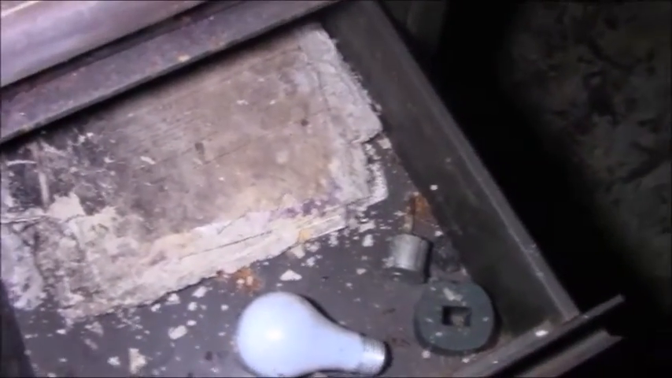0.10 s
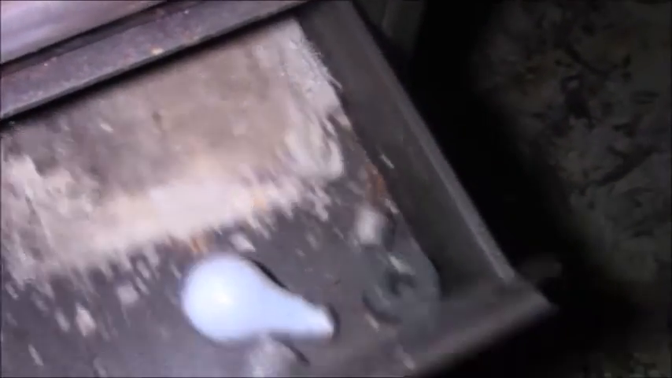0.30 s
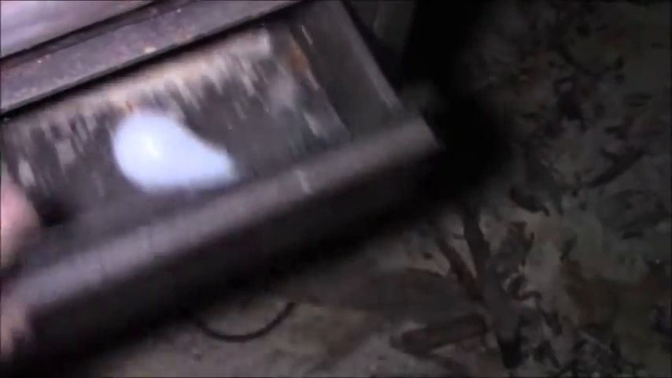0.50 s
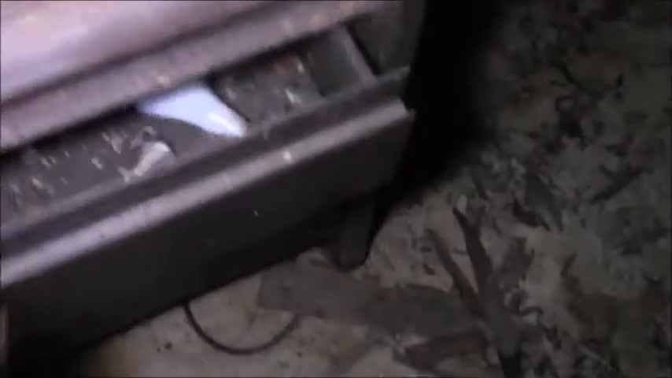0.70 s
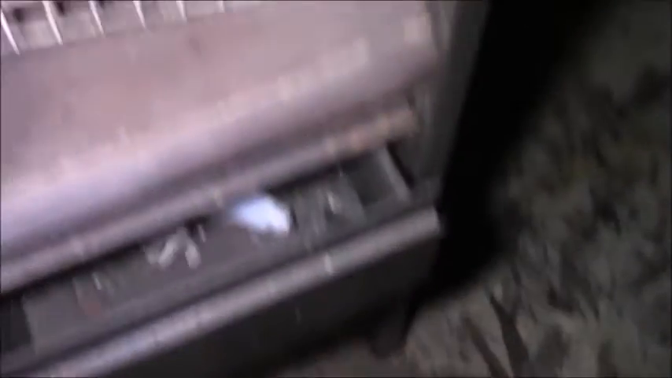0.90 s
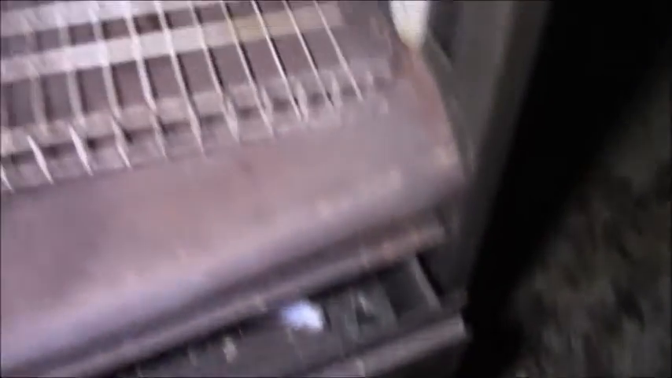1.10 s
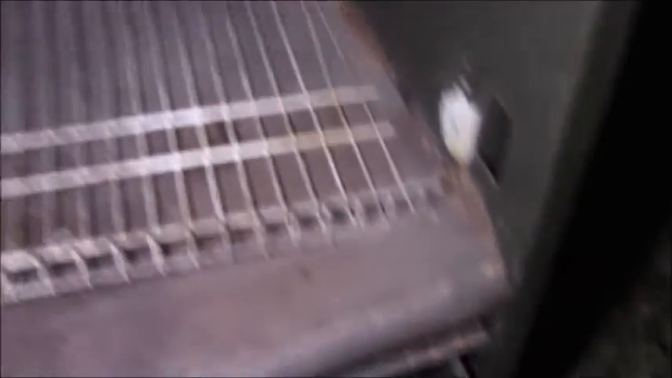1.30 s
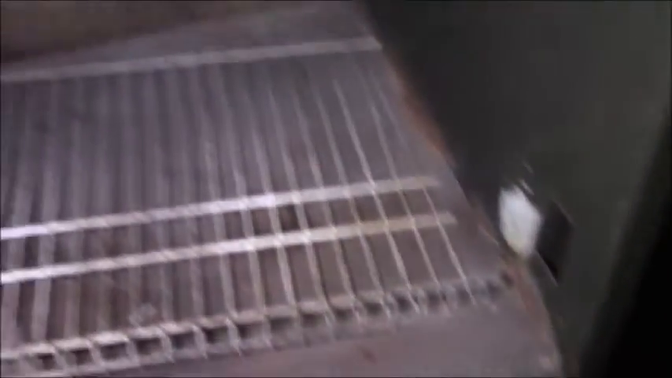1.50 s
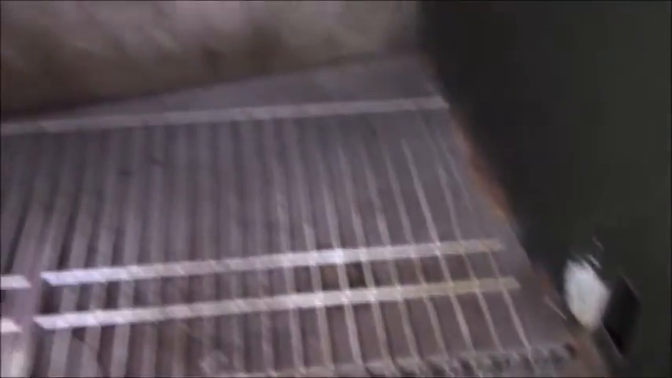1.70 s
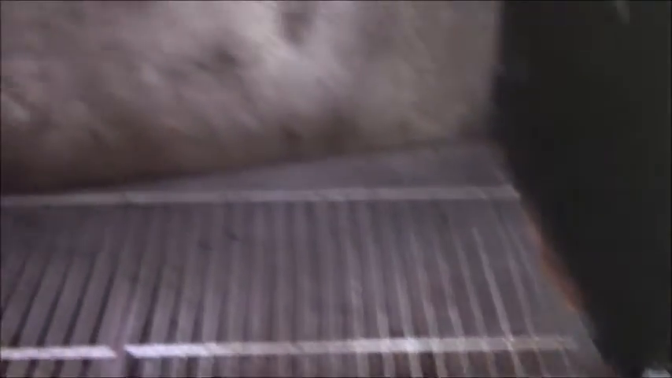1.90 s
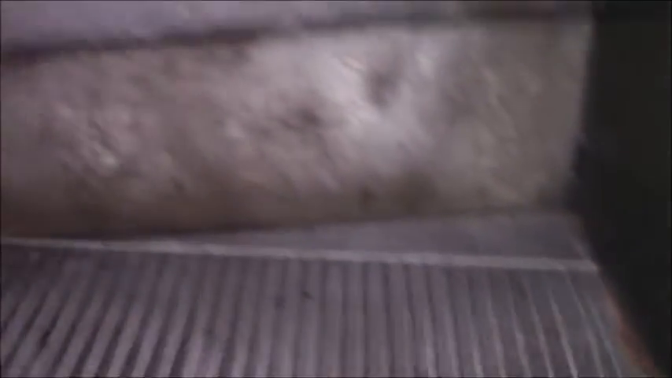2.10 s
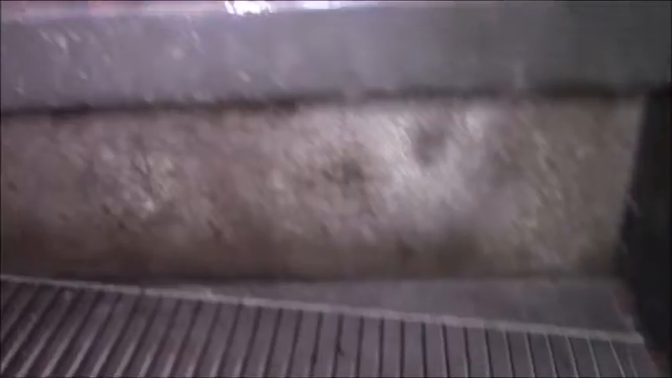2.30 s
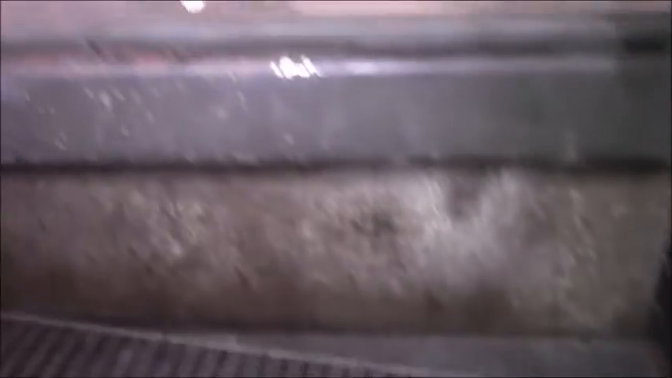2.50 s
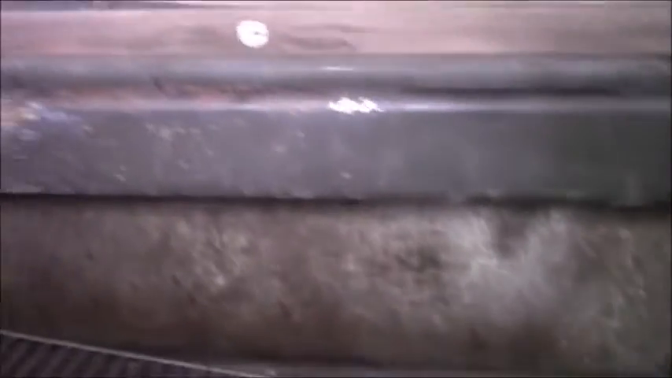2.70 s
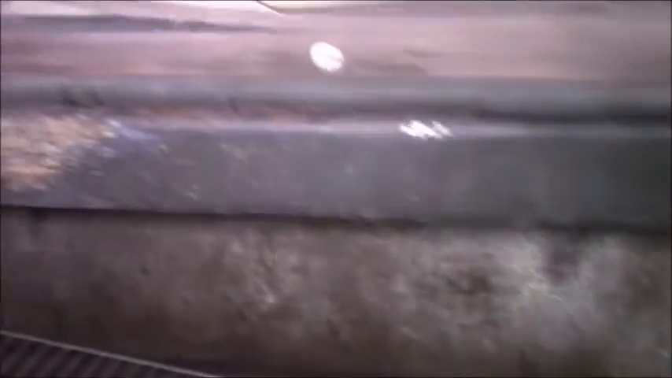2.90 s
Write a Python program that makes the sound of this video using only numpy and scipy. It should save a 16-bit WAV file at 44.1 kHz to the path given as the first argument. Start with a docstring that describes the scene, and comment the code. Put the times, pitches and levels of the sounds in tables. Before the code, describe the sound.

A rusty metal drawer knocks and thumps, then scrapes shut with gritty rasp and hollow panel boom from 0.2 to 0.7 s. A loose glass bulb clinks sharply at 0.7 s. Soft shuffling and low bumps follow; a metal speck bounces at 1.45 s, crumbs tick. From 2.15 s another drawer thumps and rasps out in two tugs, clunking at 2.7 s. Close, near-mono, bare room, faint hiss and thin whine.

```python
"""A rusty sheet-metal drawer is pushed shut, and another is dragged out in two tugs, in a bare workshop.
Random grit clicks hiss and rasp, coarser slips drive panel modes, and knocks and booms join in.
Around them a loose glass bulb clinks as decaying sines, a speck of metal bounces and crumbs tick.
A close pair of microphones hears it nearly in mono, over coloured-noise hiss and a thin sine whine."""
import sys
import numpy as np
from scipy import signal
from scipy.fft import rfft, irfft, next_fast_len
from scipy.io import wavfile

SR = 44100
rng = np.random.default_rng(int(sys.argv[2]) if len(sys.argv) > 2 else 0)


def gain_from_db(level_db):
    """Turn a decibel level (scalar or array-like) into a linear amplitude factor."""
    decades = np.asarray(level_db, float) / 20
    return 10 ** decades


def transcribe(signal):
    """Save signal, clipped to [-1, 1], as a 16-bit WAV file at the path in sys.argv[1]."""
    frames = np.atleast_2d(signal).T
    limited = np.clip(frames, -1, 1)
    pcm = np.round(limited * 32767).astype(np.int16)
    wavfile.write(sys.argv[1], SR, pcm)


N = 134505


def rms_one(x):
    """Scales a signal to rms 1."""
    return x / np.sqrt(np.mean(x ** 2) + 1e-20)


def at_hz(points, hz):
    """Reads a (frequency, value) curve along a logarithmic frequency axis."""
    points = np.array(points)
    return np.interp(np.log(hz), np.log(points[:, 0]), points[:, 1])


def through(x, response):
    """Filters x by an impulse response."""
    return signal.fftconvolve(x, response)[:N]


def band_pass(x, low, high):
    """Keeps the band between two frequencies in Hz."""
    return signal.sosfilt(signal.butter(2, [low, high], "band", fs=SR, output="sos"), x)


def colour(spectrum):
    """A short causal response with this spectrum (minimum phase), of unit energy."""
    hz = np.maximum(np.fft.rfftfreq(4096, 1 / SR), 5)
    cepstrum = irfft(np.log(gain_from_db(at_hz(spectrum, hz)) + 1e-5))
    # folding the cepstrum onto positive time gives minimum phase
    cepstrum[1:2048] *= 2
    cepstrum[2049:] = 0
    response = irfft(np.exp(rfft(cepstrum)))[:2048]
    return response / np.sqrt(np.sum(response ** 2))


def ring(clicks, hz, t60):
    """A two-pole resonator: a unit click sets a sine of height 1 ringing, 60 dB down after t60 seconds."""
    radius = gain_from_db(-60 / (t60 * SR))
    angle = 2 * np.pi * hz / SR
    poles = [1, -2 * radius * np.cos(angle), radius * radius]
    return signal.lfilter([0, np.sin(angle)], poles, clicks + 1e-18)


def struck(events, modes):
    """Every blow rings all modes of a body, neighbours in opposite phase."""
    clicks = np.zeros(N)
    for s, db in events:
        clicks[int(s * SR)] = gain_from_db(db)
    return sum((-1) ** k * gain_from_db(db) * ring(clicks, hz, t60) for k, (hz, db, t60) in enumerate(modes))


def drift(hz):
    """A slow random wander of rms 1: noise through two equal low-pass poles."""
    r = np.exp(-2 * np.pi * hz / SR)
    noise = rng.standard_normal(N + 9000)
    settled = signal.lfilter([1], [1, -2 * r, r * r], noise)[9000:]
    return rms_one(settled)


def grains(per_s, spread_db):
    """Random clicks of uneven size and either sign; rms 1."""
    sizes = gain_from_db(spread_db * np.minimum(rng.exponential(1, N), 4)) * rng.choice([-1, 1], N)
    return rms_one(sizes * (rng.random(N) < per_s / SR))


# how far the side lies against the mid: (frequency [Hz], level [dB])
SIDE_LEVEL = [(60, -68), (250, -44.5), (1000, -26.5), (4000, -14), (9000, -13.5), (15000, -24.5)]


def side_signal(mid):
    """Stereo width: a weak copy of the mid, fluttering in level and smeared over some milliseconds."""
    smear = rng.standard_normal(3000) * np.exp(-np.arange(3000) / 600)
    smear /= np.sqrt(np.sum(smear ** 2))
    size = next_fast_len(N + 3000)
    hz = np.maximum(np.fft.rfftfreq(size, 1 / SR), 5)
    fluttering = mid * drift(150)
    spectrum = rfft(fluttering, size) * rfft(smear, size) * gain_from_db(at_hz(SIDE_LEVEL, hz))
    return irfft(spectrum, size)[:N]


# spectrum of the microphones' own noise: (frequency [Hz], level [dB])
HISS_SPECTRUM = [(30, -36), (110, 4), (850, 0.5), (6500, -14.5), (13000, -38), (16000, -28)]
HISS_DB = -56.5


def microphone_hiss():
    """Steady white noise, coloured by the hiss spectrum."""
    return gain_from_db(HISS_DB) * through(rng.standard_normal(N), colour(HISS_SPECTRUM))


# electronic tones: (frequency [Hz], rms level [dB])
WHINE_TONES = [(7504, -76), (15003, -73)]


def electronic_whine():
    """Steady sines, high and thin."""
    t = np.arange(N) / SR
    return sum(np.sqrt(2) * gain_from_db(db) * np.sin(2 * np.pi * hz * t) for hz, db in WHINE_TONES)


# how long the panels and the room carry on: (frequency [Hz], t60 [s])
PANEL_DECAY = [(60, 1), (250, 0.82), (700, 0.38), (2000, 0.18), (6000, 0.63), (14000, 0.023)]


def panels():
    """Dense modes of sheet metal and walls: one second of noise dying away band by band."""
    t, response = np.arange(SR) / SR, np.zeros(SR)
    edges = 30 * 2 ** np.arange(0, 9.6, .5)
    white = rng.standard_normal((2, SR))   # neighbouring bands use separate noise
    for k, (low, high) in enumerate(zip(edges, edges[1:])):
        fade = gain_from_db(-60 * t / at_hz(PANEL_DECAY, np.sqrt(low * high)))
        response += band_pass(white[k % 2], low, high) * fade / np.sqrt(np.sum(fade ** 2))
    return response


# crumbs falling on the metal: (time [s], level [dB], pitch [Hz])
CRUMBS = [(1.643, -31.5, 2010), (1.717, -44, 2230), (2.073, -31, 4370)]
TICK_CYCLES, TICK_OVERTONE = 11.0, 2.1   # cycles of the pitch within t60; frequency ratio


def ticks():
    """Each crumb rings a few cycles at its pitch and at a weaker overtone."""
    out = 0
    for s, db, hz in CRUMBS:
        t60 = TICK_CYCLES / hz
        out = out + struck([(s, db)], [(hz, 0, t60), (TICK_OVERTONE * hz, -4, t60)])
    return out


# a speck of metal bounces to rest: (time [s], level [dB])
SPECK_BOUNCES = [(1.4513, -18.5), (1.5278, -26.5), (1.565, -37), (1.588, -42)]
# its modes: (frequency [Hz], level [dB], t60 [s])
SPECK_MODES = [(4970, 3.5, 0.0022), (8000, -0.5, 0.0018), (10200, -9.5, 0.0023), (9100, -20, 0.068),
               (9560, -41, 0.65), (15000, -19, 0.027)]


def metal_speck():
    """Every bounce strikes the high modes of the speck afresh."""
    return struck(SPECK_BOUNCES, SPECK_MODES)


# modes of the glass bulb, close pairs beating: (frequency [Hz], level [dB], t60 [s])
BULB_MODES = [(2140, 3, .115), (2155, -1.5, .165), (2079, -20, .35), (2164, -11, .38), (1988, -22, .2),
              (2206, -20, .42), (3055, -32, .8), (3187, -19, .24), (5135, -19, .15), (5160, -23, .35),
              (6584, -22, .11), (8441, -22, .09)]
CLINK_S, CLINK_DB, CRACK_DB, CLINK_ROOM_DB = 0.7092, -9.5, -2.5, -18


def bulb():
    """One hard clink: a short crack, then the glass sings, also through the panels."""
    crack_modes = [(2200, 0, .010), (1250, -9, .02), (5500, -14, .005)]   # (Hz, dB, t60 s)
    crack = struck([(CLINK_S, CRACK_DB)], crack_modes)
    glass = crack + struck([(CLINK_S, CLINK_DB)], BULB_MODES)
    return glass + gain_from_db(CLINK_ROOM_DB) * through(glass, panels())


# a panel flexes and booms: (time [s], peak level [dB], pitch [Hz])
PANEL_THUMPS = [(.031, -29.5, 465), (.211, -17, 399), (0.227, -16, 302), (.638, -17.5, 202),
                (1.011, -25, 227), (1.112, -37, 232), (1.177, -28.5, 219), (1.304, -25.5, 233),
                (1.335, -30.5, 200), (2.162, -13, 273), (2.192, -16.5, 258.7), (2.322, -14.5, 280)]
THUMP_CYCLES = 12   # cycles in which the exponential part of the decay loses 60 dB


def thumps():
    """A flexing panel: each boom is a sine that swells over a cycle or two and dies."""
    t, out = np.arange(N) / SR, 0
    for s, db, hz in PANEL_THUMPS:
        cycles = np.clip(t - s, 0, None) * hz
        age = cycles * np.log(1000) / THUMP_CYCLES
        out = out + gain_from_db(db) * age * np.exp(1 - age) * np.sin(2 * np.pi * cycles)
    return out


# knocks and scuffs on the sheet metal:
# (time [s], crack [dB], clank [dB], decay constant [s], pitch [Hz])
METAL_KNOCKS = [(0.002, -40, -44.5, 0.035, 1670), (0.03, -32, -34, 0.0081, 1780),
                (0.189, -35.5, -32, 0.0078, 1990), (0.214, -53, -23.5, 0.0021, 1200),
                (0.286, -32, -20, 0.0052, 800), (0.694, -42, -33, 0.0023, 1960),
                (0.708, -25.5, -19.5, 0.0053, 1240), (0.844, -39.5, -37, .010, 1930),
                (0.984, -43, -40.5, 0.015, 1730), (1.145, -38.5, -32.5, 0.023, 1750),
                (1.279, -52, -25.5, 0.0022, 990), (1.29, -42, -33, 0.014, 1130),
                (1.99, -48, -59, 0.021, 2500), (2.1, -40.5, -52, 0.0074, 1510),
                (2.143, -40.5, -28, 0.0077, 1330), (2.16, -37, -37.5, 0.019, 2580),
                (2.688, -24.5, -12, 0.0041, 936)]
KNOCK_CYCLES = 8.6       # cycles of the pitch within t60
KNOCK_BROAD_DB = -3.5    # broadband clank against the tabled level
RISE_PER_S = 28          # longer scuffs rise more gently: share of the length, per second of length


def knocks():
    """Envelopes of crack and clank; each clank also rings at the pitch of the spot that is hit."""
    t, noise = np.arange(N) / SR, rng.standard_normal(N)
    crack_power, clank_power, spots = np.zeros(N), np.zeros(N), 0
    for s, crack_db, clank_db, length, hz in METAL_KNOCKS:
        age = np.clip(t - s, 0, None) / length
        shape = 2 * (1 - np.exp(-age / (RISE_PER_S * length))) * np.exp(-age)
        crack_power += (gain_from_db(crack_db) * shape) ** 2
        clank_power += (gain_from_db(clank_db + KNOCK_BROAD_DB) * shape) ** 2
        t60 = KNOCK_CYCLES / hz
        # the root evens out the level of short and long rings
        spots = spots + ring(gain_from_db(clank_db) * shape * noise, hz, t60) / np.sqrt(t60 * SR / 28)
    return np.sqrt(crack_power), np.sqrt(clank_power), spots


# loose contents roll and a sleeve brushes between the slides: (time [s], grit [dB], load [dB])
SHUFFLE_CURVE = [(.72, -55.5, -23), (.95, -56, -43.5), (1.1, -63, -38.5), (1.42, -58.5, -40),
                 (1.75, -71.5, -77.5), (1.95, -61.5, -68), (2.132, -52, -53), (2.82, -56, -30.5),
                 (2.95, -50.5, -43), (3.05, -53.5, -50.5)]
# the first drawer's runners slide shut: (time [s], grit [dB], load on the panels [dB])
PUSH_CURVE = [(0.139, -52, -48), (.195, -42.5, -27), (0.229, -53, -34.5), (0.288, -35.5, -28.5),
              (0.401, -31.5, -19.5), (0.449, -35.5, -17), (0.463, -26.5, -21), (0.568, -31.5, -19.5),
              (0.631, -38, -22.5), (0.661, -55, -29), (0.708, -45, -21)]
# the second drawer's runners are tugged out: (time [s], grit [dB], load on the panels [dB])
PULL_CURVE = [(2.166, -91, -19.5), (2.25, -47.5, -39), (2.298, -41, -23.5), (2.348, -27, -26),
              (2.408, -27, -17.5), (2.461, -38.5, -20.5), (2.551, -48.5, -23.5), (2.589, -33.5, -20),
              (2.66, -28.5, -21.5), (2.708, -31, -23), (2.748, -46.5, -24), (2.819, -53, -30.5)]


def slide():
    """Grit and panel load in dB over time; push and pull replace the shuffle while they last."""
    t = np.arange(N) / SR
    grit, load = np.full(N, -120.), np.full(N, -120.)
    for rows in SHUFFLE_CURVE, PUSH_CURVE, PULL_CURVE:
        s, grit_db, load_db = np.transpose(rows)
        inside = (t > s[0]) & (t < s[-1])
        grit[inside] = np.interp(t[inside], s, grit_db)
        load[inside] = np.interp(t[inside], s, load_db)
    return grit, load


PATCH_DB, PATCH_HZ = 3.0, 12.0   # rms swing of the bands, corner of their wander


def patchy(x):
    """The contact moves along the runner, so narrow bands swell and sink each on their own."""
    edges = 400 * 2 ** np.arange(0, 5.6, .18)
    out = 0
    for k, (low, high) in enumerate(zip(edges, edges[1:])):
        out = out + (-1) ** k * band_pass(x, low, high) * gain_from_db(PATCH_DB * drift(PATCH_HZ))
    return out


# lowest modes of the drawer that shuts: (frequency [Hz], level [dB])
FIRST_MODES = [(135, -6.5), (195, -6.5), (240, -2.5), (320, -1), (400, -13), (525, -5.5), (604, -9.5)]
# lowest modes of the drawer that opens: (frequency [Hz], level [dB])
SECOND_MODES = [(92, -8), (262, -0.5), (303, -2), (360, -0.5), (420, -4), (545, -3), (640, -11),
                (690, -4.5)]
MODES_DB, MODE_SWING_DB = -4.5, 2.5
MODE_CYCLES, CHANGE_S = 27.2, 1.8   # cycles within t60; when the second drawer takes over [s]


def drawer_modes(slips):
    """Slips ring the lowest modes of the drawer in use; each mode comes and goes as the drawer moves."""
    first, out = np.arange(N) < CHANGE_S * SR, 0
    for table, when in (FIRST_MODES, first), (SECOND_MODES, ~first):
        for k, (hz, db) in enumerate(table):
            t60 = MODE_CYCLES / hz
            drive = slips * when * gain_from_db(MODES_DB + db + MODE_SWING_DB * drift(PATCH_HZ))
            out = out + (-1) ** k * ring(drive, hz, t60) / np.sqrt(t60 * SR / 14)
    return out


# spectrum of the fine grit: (frequency [Hz], level [dB per Hz])
GRIT_SPECTRUM = [(1800, 3), (3200, 0), (6000, -0.5), (9000, -4.5), (13500, -11), (16000, -30)]
# spectrum of the coarse rasp: (frequency [Hz], level [dB per Hz])
RASP_SPECTRUM = [(300, 4.5), (550, -2), (900, 0), (1750, -2), (3200, -15), (6000, -32)]
# spectrum of the panels under load: (frequency [Hz], level [dB per Hz])
BOOM_SPECTRUM = [(28, -51), (80, 2.5), (160, -6), (230, 8), (450, -5), (1000, -4.5), (2000, -54)]
FINE_PER_S, COARSE_PER_S, GRAIN_SPREAD_DB = 3500, 3500 / 3, 2.5
SLIPS_PER_S, SLIP_SPREAD_DB = 400, 1
RASP_DB, RASP_FROM_GRIT, RASP_FROM_LOAD = 6.5, 0.63, 0.58   # offset, then dB per dB
JUDDER_DB, JUDDER_HZ = 1, 59.5
BOOM_DB = -6
DIRECT_SHARE = 0.51   # share of power that skips the panels


def drawers():
    """Fine grains hiss, coarser ones rasp, slips thump the panels; knocks join in."""
    grit, load = slide()
    crack, clank, spots = knocks()
    judder = gain_from_db(JUDDER_DB * drift(JUDDER_HZ))
    rasp = gain_from_db(RASP_DB + RASP_FROM_GRIT * grit + RASP_FROM_LOAD * load)
    fine_level = np.hypot(gain_from_db(grit) * np.sqrt(judder), crack)
    fine = grains(FINE_PER_S, GRAIN_SPREAD_DB) * fine_level
    coarse = grains(COARSE_PER_S, GRAIN_SPREAD_DB) * np.hypot(rasp * judder, clank)
    slips = grains(SLIPS_PER_S, SLIP_SPREAD_DB) * gain_from_db(load) * np.sqrt(judder)
    modes = drawer_modes(slips)
    hiss = patchy(through(fine, colour(GRIT_SPECTRUM)))
    boom = gain_from_db(BOOM_DB) * through(slips, colour(BOOM_SPECTRUM))
    force = patchy(through(coarse, colour(RASP_SPECTRUM))) + boom + spots + thumps()
    turn = drift(PATCH_HZ / 2)   # the contact wanders, so other sets of modes answer
    tail = through(force * np.cos(turn), panels()) + through(force * np.sin(turn), panels())
    return hiss + modes + np.sqrt(DIRECT_SHARE) * force + np.sqrt(1 - DIRECT_SHARE) * tail


def scene():
    """Sums the sources into a mid signal and spreads it slightly; the whine stays in the middle."""
    mid = drawers() + bulb() + metal_speck() + ticks() + microphone_hiss()
    side = side_signal(mid)
    mid = mid + electronic_whine()
    return np.array([mid + side, mid - side])


def top_cut(x):
    """Nothing passes above the cut-off."""
    return signal.sosfilt(signal.butter(12, 16650, fs=SR, output="sos"), x)


def record(dry):
    """The microphones lose the deepest bass, below 74 Hz."""
    mix = signal.sosfilt(signal.butter(2, 74, "high", fs=SR, output="sos"), dry)
    return top_cut(mix)


dry = scene()
out = record(dry)
transcribe(out)
```